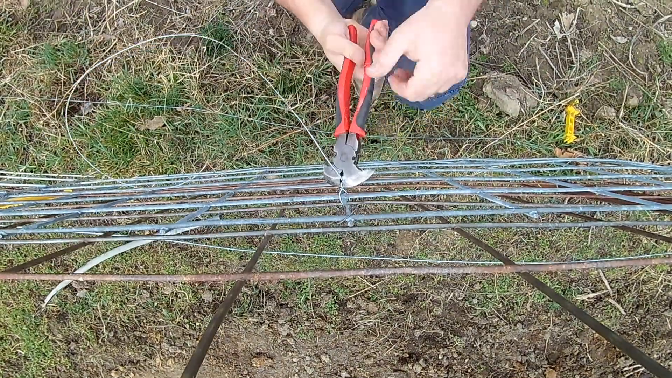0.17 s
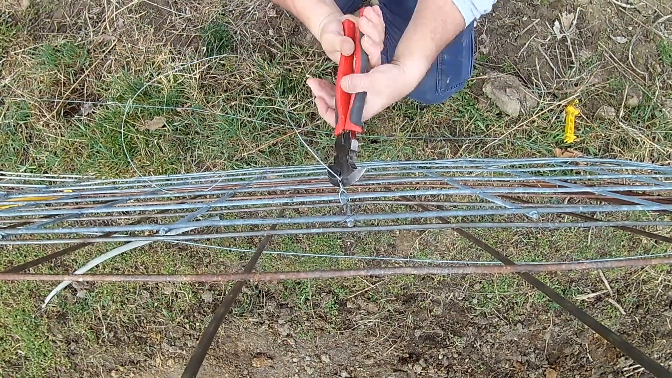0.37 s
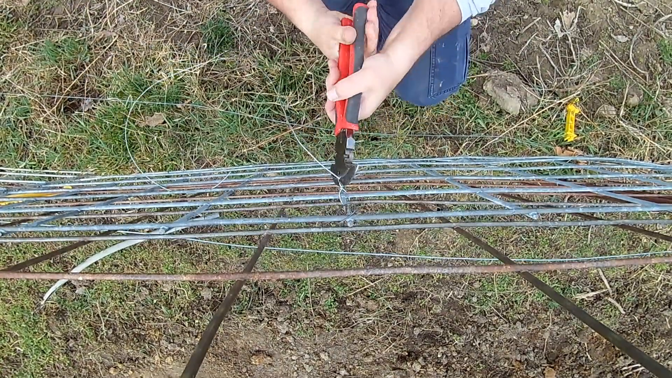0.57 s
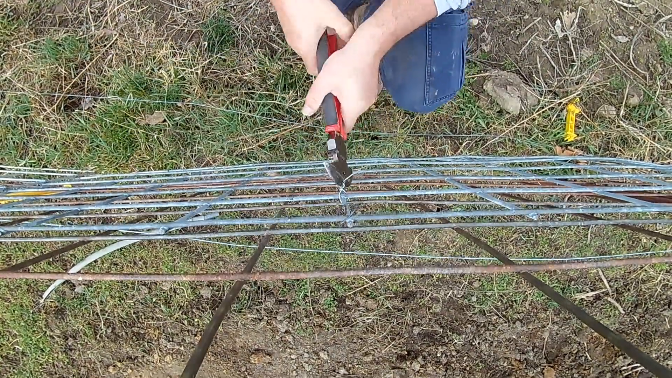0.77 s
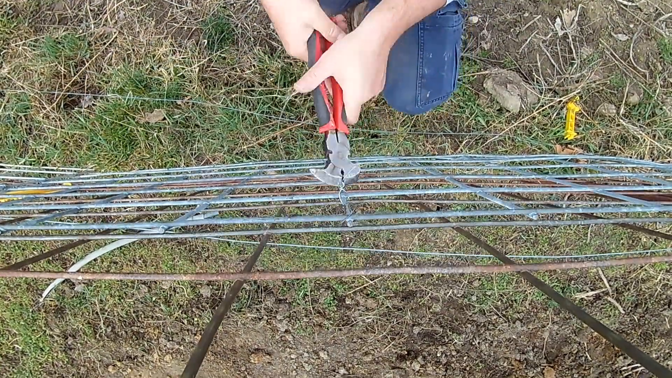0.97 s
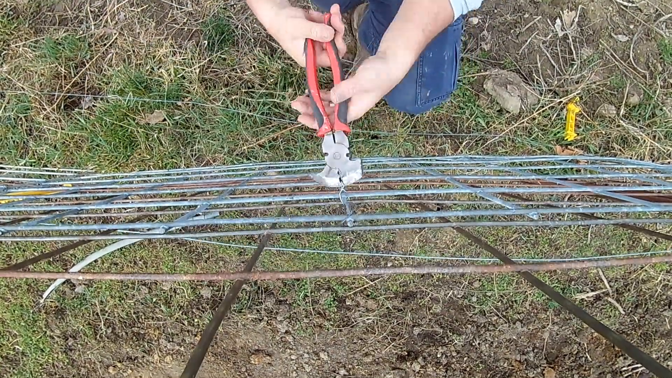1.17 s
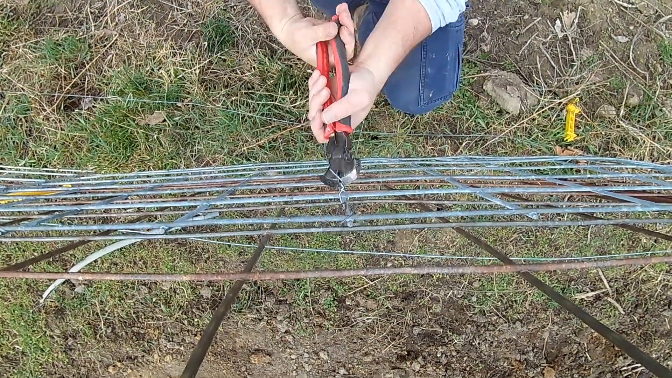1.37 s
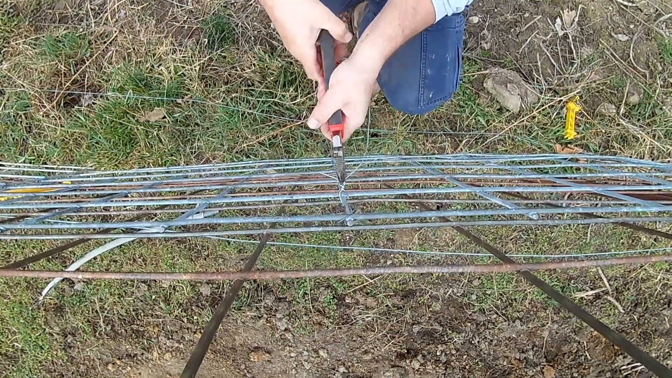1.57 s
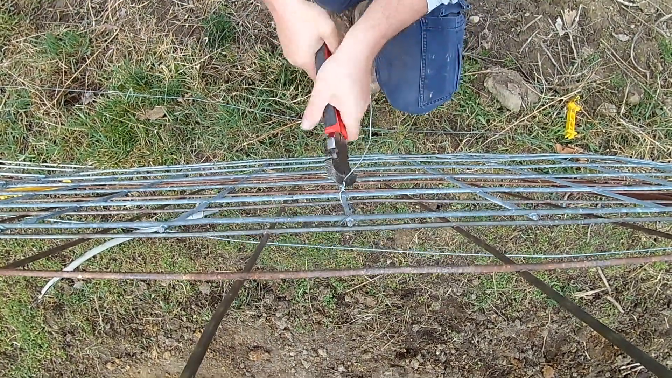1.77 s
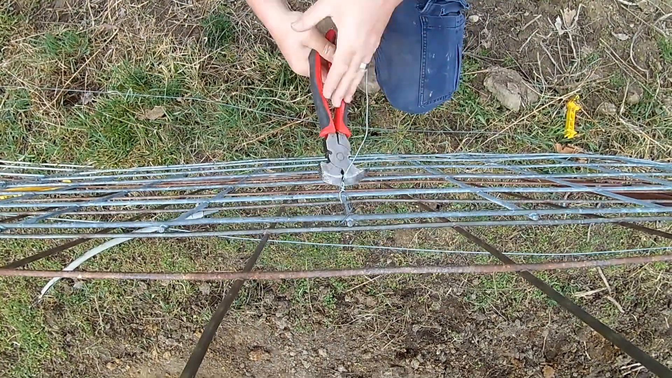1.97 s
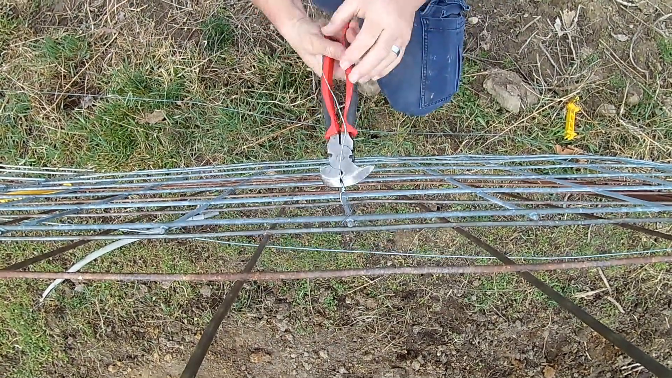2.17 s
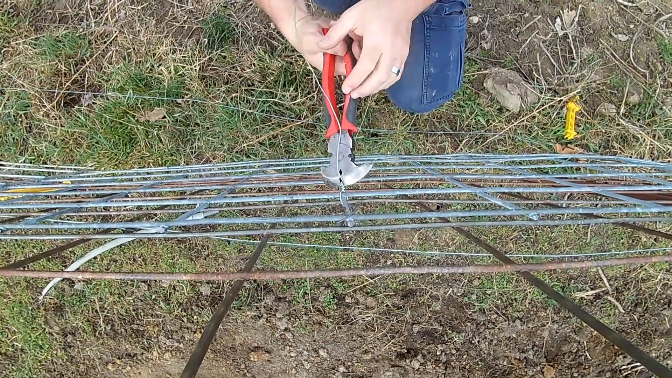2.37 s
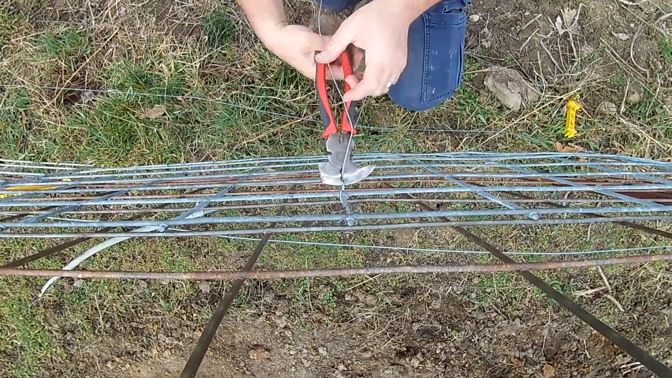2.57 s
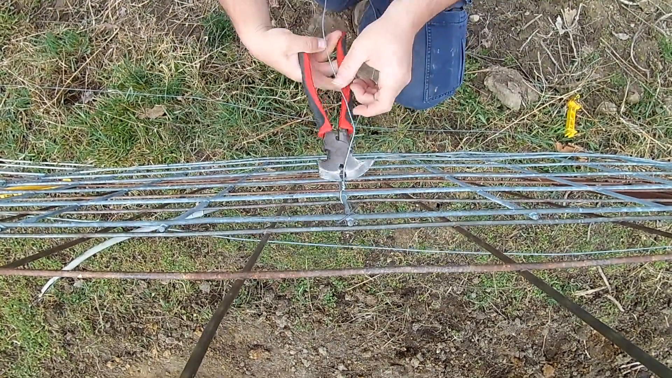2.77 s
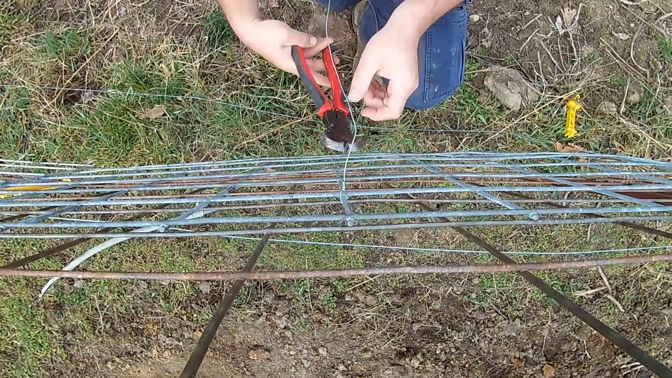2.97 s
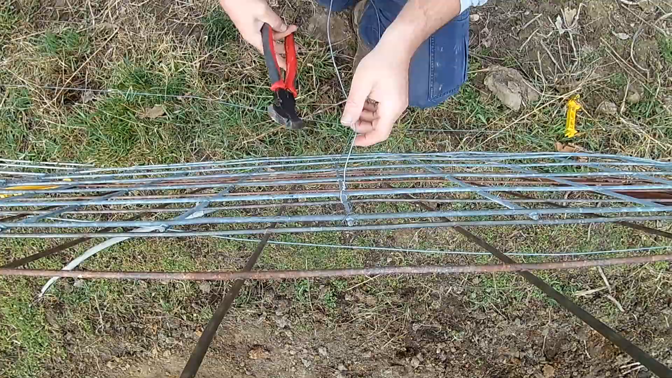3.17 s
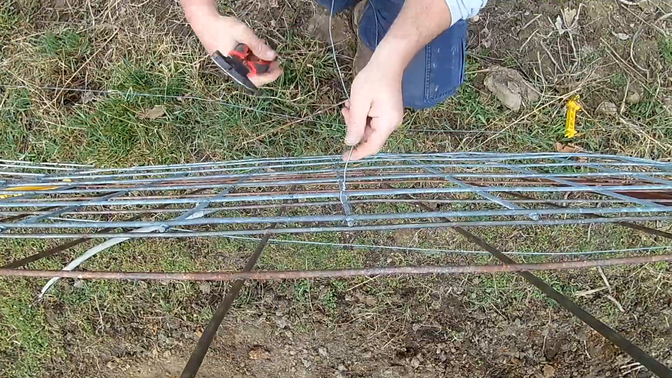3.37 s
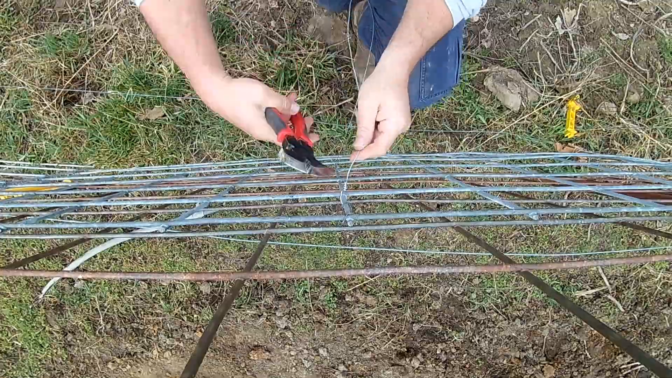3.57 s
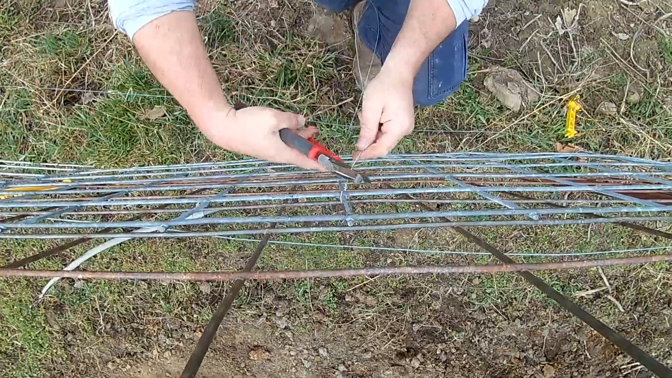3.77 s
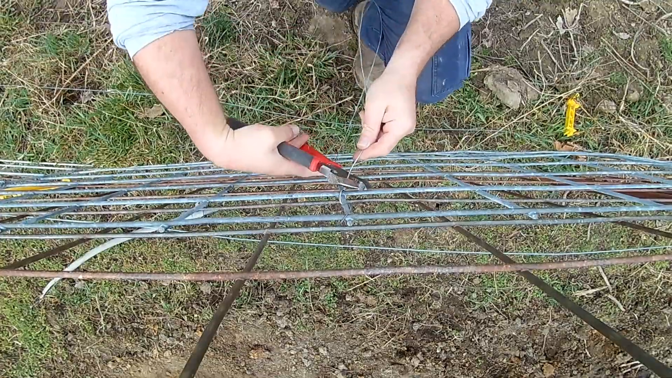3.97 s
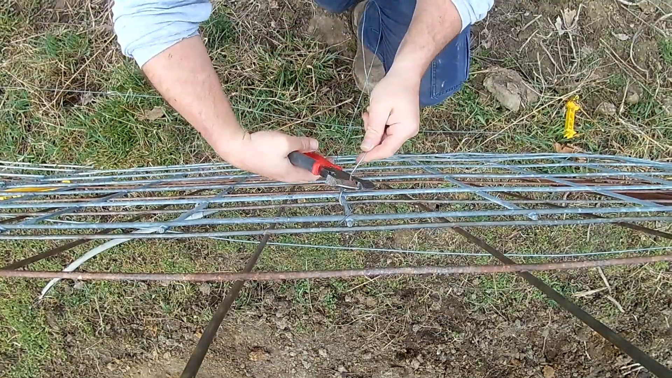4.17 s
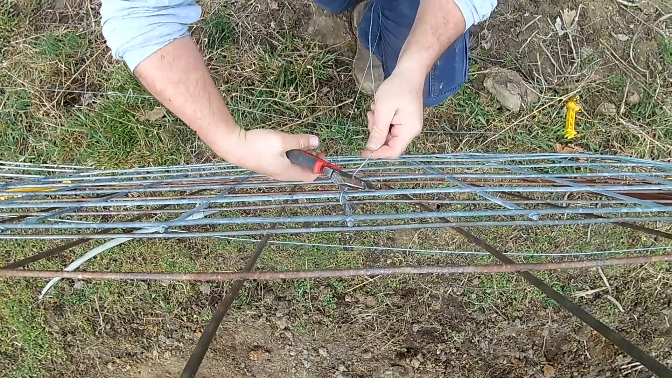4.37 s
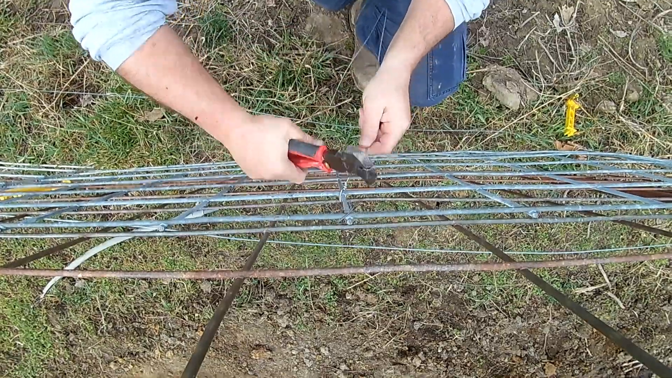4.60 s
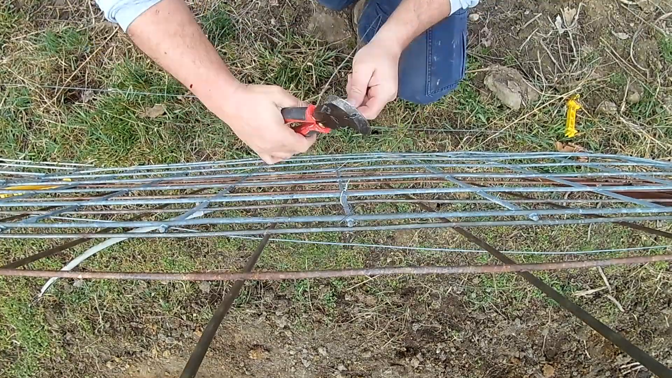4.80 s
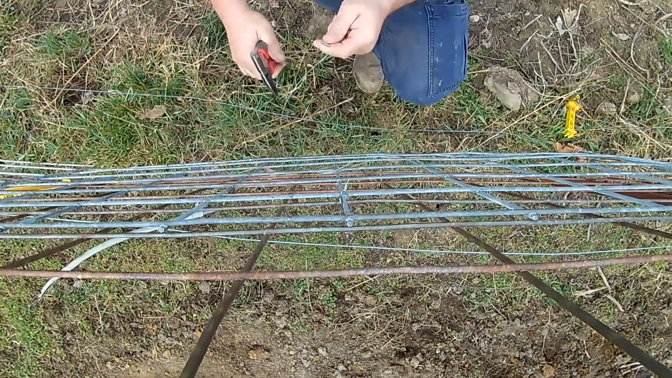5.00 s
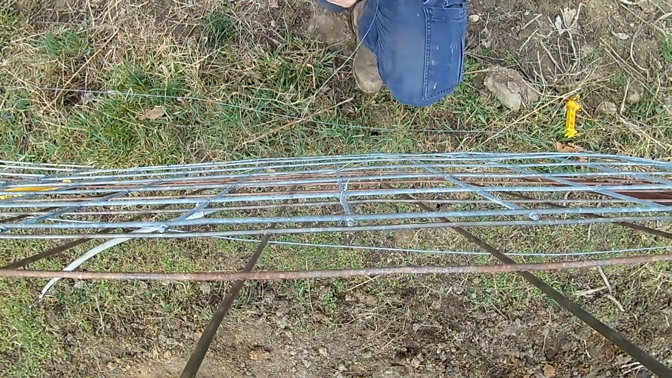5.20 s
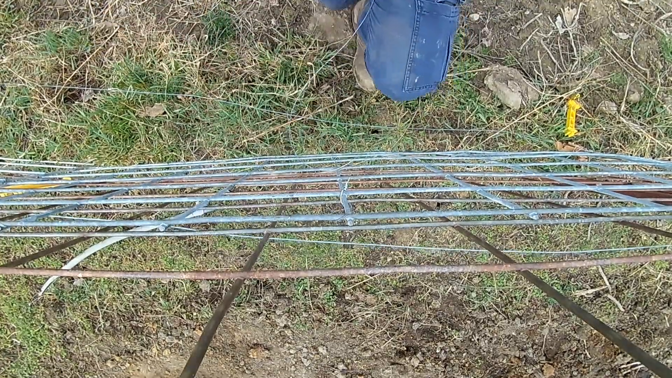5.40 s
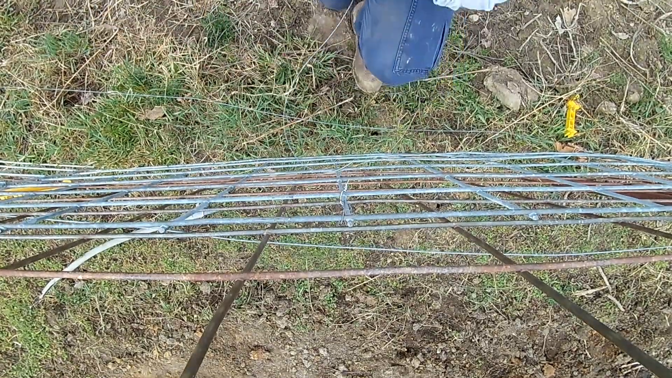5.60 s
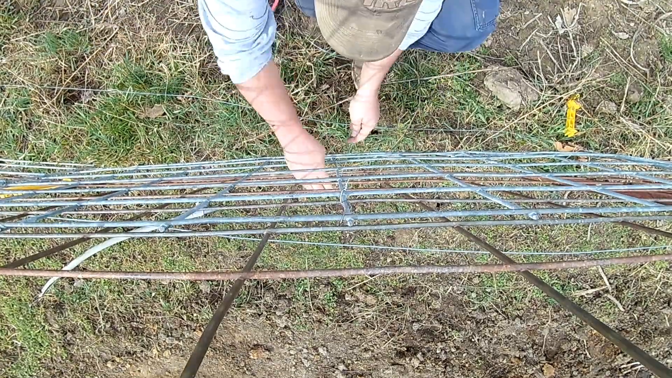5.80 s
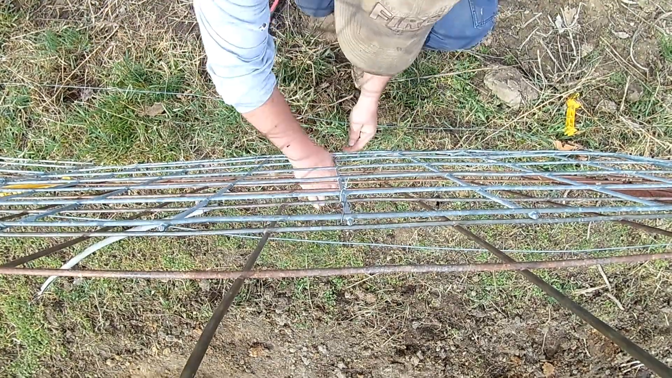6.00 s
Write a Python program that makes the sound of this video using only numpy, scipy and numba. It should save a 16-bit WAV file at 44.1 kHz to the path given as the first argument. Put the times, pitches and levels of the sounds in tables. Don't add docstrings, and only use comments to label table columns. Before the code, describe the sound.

Pliers twist and snip a tie wire on a welded steel fence panel, squealing scrapes and clanging ring over faint outdoor wind.

```python
import sys
import numpy as np
from numba import njit
from scipy import signal
from scipy.fft import rfft, irfft
from scipy.io import wavfile
from scipy.ndimage import uniform_filter1d, minimum_filter1d, map_coordinates

SR = 44100
rng = np.random.default_rng(int(sys.argv[2]) if len(sys.argv) > 2 else 0)


def boost_factor(decibels):
    exponent = np.asarray(decibels, float) / 20
    return 10 ** exponent


def file_out(sig):
    cols = np.atleast_2d(sig).T
    lim = np.clip(cols, -1, 1)
    pcm = np.round(lim * 32767).astype(np.int16)
    wavfile.write(sys.argv[1], SR, pcm)


N = 266540

# t/s, level/dB
WIND = [(0.0, -67), (0.89, -64), (0.96, -54), (1.14, -62), (1.39, -53), (3.95, -60), (4.02, -47),
        (4.29, -50), (4.64, -46), (5.7, -65.5), (5.74, -45), (6.04, -44)]
# f/Hz, density/dB
AIR = [(59, -27), (100, -6.5), (147, -13.5), (190, -14), (271, -22), (791, -25), (945, -21.5), (1850, -43),
       (3500, -43.5), (4550, -88.5), (7700, -120)]
# from f/Hz, to f/Hz, mode count, t60/s, scrape roughness/dB, lift of strongest modes/dB
PARTS = [
    (70, 140, 6, .5, .6, 1.5),
    (160, 750, 50, 1.1, 1.2, 5),
    (750, 1750, 90, .85, 3., 6),
    (1750, 3200, 150, .6, 3.5, 7),
    (3200, 5800, 90, .35, 2.5, 10),
    (8400, 15700, 140, .15, 2., -25),
]
# wind excitation level/dB, far-panel return level/dB, return t60/s
FAR = [(-70.5, -6, 2.3), (-76, -7, 2.46), (-65.5, -10.5, 2.15), (-75, -22.5, 5), (-83.5, -25.5, 1.8),
       (-104, -22, 0.73)]
# f/Hz, density/dB
PANEL_COLOUR = [(41, -47), (70, -24.5), (103, -8), (151, -11.5), (240, -12.5), (305, -21.5), (462, -2.5),
                (578, -11.5), (890, -12), (1060, -13.5), (1130, -18), (1580, -3.5), (1740, -8),
                (2250, -14.5), (3200, -13), (4160, -51), (7040, -120)]
# f/Hz, density/dB
WELD_COLOUR = [(1880, -35), (3200, 2.5), (3440, -16), (4020, -9), (4200, 2), (4320, -8.5), (4560, 8),
               (5110, -15), (5260, -7.5), (5550, 5), (5800, -5.5), (7540, -47), (12800, -120)]
# f/Hz, level/dB
STRONG_MODES = [(96.9, -52), (242.2, -42.5), (355.3, -48), (457.6, -45), (640.6, -49), (678.3, -47),
                (904.4, -28.5), (985.1, -62), (1163, -26.5), (1335, -30.5), (1604, -42), (1782, -44.5),
                (1922, -48.5), (2078, -87), (2186, -41.5), (2519, -43), (2880, -52), (3289, -70),
                (3321, -52.5), (3580, -74.5), (3623, -60), (3736, -74.5), (3784, -60), (3941, -70.5),
                (4156, -60.5), (4420, -91), (4474, -51), (4888, -61), (5173, -63), (5453, -52.5)]
# f/Hz, width/Hz, level/dB
THIN_GROUPS = [(6100, 39, 1), (5700, 50, -15), (6870, 100, -11), (6890, 120, -13.5), (6980, 240, -2.5),
               (7030, 350, -30), (7660, 52, -18), (8900, 130, -7.5), (9620, 47, -14.5), (10400, 170, -14),
               (11100, 120, -16.5), (11600, 100, -24.5)]
# start t/s, length/s, rods level/dB, frame re rods/dB, welds re rods/dB
SCRAPES = [(0.125, 0.052, -26, -6.5, -9), (0.856, 0.052, -26.5, -5, -9.5), (1.659, 0.02, -47.5, -21.5, -11),
           (2.077, 0.045, -32.5, -17.5, -8), (2.17, 0.03, -23.5, -7, -13), (2.504, 0.017, -35.5, -3, -22),
           (2.872, 0.023, -38.5, -0.5, -18), (3.563, 0.021, -46.5, -11, -17), (3.86, 0.12, -40, -4, -28),
           (3.962, 0.027, -32, -1.5, -12.5), (3.994, 0.037, -28, -0.5, -26.5),
           (4.453, 0.089, -39.5, -5.5, -14.5), (4.598, 0.061, -17, -2, -16), (5.18, 0.058, -47.5, -9, -5.5),
           (5.51, 0.052, -49, -9, -12.5), (5.836, 0.15, -51.5, 1.5, -13), (5.966, .08, -37, -4.5, -25.5)]
# middle t/s, length/s, rods level/dB, frame re rods/dB, welds re rods/dB
DRAGS = [(.33, 0.15, -26, -11.5, -16.5), (0.47, 0.3, -24, -11, -11), (0.74, 0.48, -33, -13.5, -14.5),
         (1.016, 0.36, -19.5, -10.5, -11), (1.242, .12, -34.5, -6.5, -17), (1.534, 0.059, -49.5, -4, -11),
         (1.914, 0.79, -53.5, -0.5, -9.5), (3.7, 0.17, -54.5, -1.5, -27), (4.244, 0.35, -40, 4.5, -16),
         (4.8, 0.41, -26.5, -4.5, -26), (3.385, 0.036, -56.5, -6, -6.5)]
# t/s, rods level/dB, frame re rods/dB, welds re rods/dB
BLOWS = [(0.125, -17, -15, -13.5), (2.1, -20.5, -18, -19.5), (2.189, -24.5, -9.5, -5),
         (2.889, -31, -12.5, -15.5), (3.881, -30.5, -5.5, -16), (3.977, -33.5, 2, -21),
         (4.009, -20, -12, -21.5), (4.482, -25, -9.5, -24), (4.624, -1.5, -8, -17.5), (5.193, -55, -8, 1.5),
         (5.512, -38.5, -15, -15.5), (5.96, -35, -3.5, -8)]
# t/s, level/dB
BUMPS = [(0.3, -51), (0.907, -41), (1.106, -46), (2.301, -41), (2.723, -39.5), (3.036, -41), (3.266, -49),
         (4.012, -27), (4.227, -31.5), (4.48, -36), (4.633, -25), (4.709, -28), (4.899, -48), (5.75, -38),
         (5.838, -36.5)]
# f/Hz, level/dB, t60/s
STAND_MODES = [(82, -6, .2), (96, 2.5, 0.43), (119, -9, 0.23)]
# t/s, length/s, from f/Hz, to f/Hz, level/dB
CHIRPS = [
    (3.135, .045, 4080, 4000, -72),
    (3.19, .04, 3380, 3250, -67),
    (3.222, .04, 3120, 2800, -69),
]
# t/s, level/dB
JOINT_CLICKS = [
    (3.401, -47.5),
    (3.4224, -47),
    (3.436, -58),
    (3.4425, -63),
]
# f/Hz, level/dB, t60/s
JOINT_MODES = [(1030, -1, 0.017), (2080, 0.5, 0.013), (3280, -13, .01), (4680, 0.5, 0.0083),
               (5700, 10, 0.0041), (6500, 0, 0.0068)]
# t/s, level/dB, length/s
BUZZ_RUNS = [(4.028, -28.5, 0.016), (4.054, -30.5, 0.02), (4.0897, -25.5, 0.02), (4.116, -27, 0.016),
             (4.174, -41, 0.0085), (4.232, -44.5, 0.006), (4.256, -34, 0.0085), (4.315, -34.5, 0.011),
             (4.348, -46.5, 0.01), (4.6315, -17.5, 0.046), (4.67, -23.5, 0.099), (4.676, -13.5, 0.023),
             (4.712, -28, 0.05), (4.768, -26, 0.027), (4.8194, -36.5, 0.014), (4.8966, -27, 0.015)]
# t/s, gain
FADE = [
    (5.665, 1),
    (5.712, 0.045),
    (5.722, 0),
    (5.76, 0.85),
]

CUT_S = 5.716


def track(points):
    t_s, value = np.array(points, float).T
    return np.interp(np.arange(N) / SR, t_s, value)


def shape(points, hz):
    at_hz, db = np.array(points, float).T
    return np.interp(np.log(hz), np.log(at_hz), db)


def coloured(points):
    gain = boost_factor(shape(points, np.fft.rfftfreq(N, 1 / SR) + 1))
    noise = irfft(rfft(rng.standard_normal(N)) * gain, N)
    return noise / noise.std()


def passband(x, lo_hz, hi_hz):
    sos = signal.butter(3, [lo_hz, min(hi_hz, .45 * SR)], "band", fs=SR, output="sos")
    return signal.sosfilt(sos, x)


def ticks(times_s, sizes):
    x = np.full(N, 1e-18)
    np.add.at(x, np.minimum((np.asarray(times_s) * SR).astype(int), N - 1), sizes)
    return x


def decaying(x, tau_s):
    return signal.lfilter([1], [1, -np.exp(-1 / (tau_s * SR))], x)


@njit(fastmath=True)
def ring(force, hz, t60, gain, stop):
    pole = np.exp((2j * np.pi * hz - np.log(1000) / t60) / SR)
    c, s = pole.real.copy(), pole.imag.copy()
    re, im, out = 0 * hz, 0 * hz, 0 * force
    for i in range(len(force)):
        if i == stop:
            re, im = 0 * hz, 0 * hz
        total = 0.
        for k in range(len(hz)):
            turned = re[k] * c[k] - im[k] * s[k] + force[i]
            im[k] = re[k] * s[k] + im[k] * c[k]
            re[k] = turned
            total += gain[k] * im[k]
        out[i] = total
    return out


def knocks(times_s, sizes, modes, lo_hz, hi_hz):
    hz, db, t60 = np.array(modes, float).T
    return ring(passband(ticks(times_s, sizes), lo_hz, hi_hz), hz, t60, boost_factor(db), -1)


def outdoors():
    gust_db, gust_hz, air_db = 5, 9.8, -71.5
    wind = coloured([(10, -35.5), (25, 5.0), (60, 8.0), (120, -30.0), (300, -15.0), (1000, -61)])
    gusts = np.interp(np.arange(N) / SR * gust_hz, np.arange(200), rng.standard_normal(200))
    return boost_factor(track(WIND) + gust_db * gusts) * wind + boost_factor(air_db + 12.5) * coloured(AIR)


def fading(x, t60_s):
    keep = np.exp(-2 * np.log(1000) / (t60_s * SR))
    shots = np.split(x, [int(CUT_S * SR)])
    return np.concatenate([signal.lfilter([1 - keep], [1, -keep], shot) for shot in shots])


def strokes():
    attack_s, release_s = 0.0073, 0.042
    stand_re_frame_db, short_rods_db, short_rods_weld_share = -18.5, 2.5, 0.54
    t = np.arange(0, N, 32)[:, None] / SR
    start_s, length_s = np.array(SCRAPES).T[:2]
    release = np.exp(-np.maximum(t - start_s - length_s, 0) / release_s)
    sudden = np.clip((t - start_s) / attack_s, 0, 1) ** 2 * release
    middle_s, length_s = np.array(DRAGS).T[:2]
    slow = np.cos(np.pi * np.clip((t - middle_s) / length_s, -.5, .5)) ** 2
    rods, frame, welds = np.array(SCRAPES + DRAGS).T[2:]
    short_rods = short_rods_db + short_rods_weld_share * welds
    db = rods + np.array([frame + stand_re_frame_db, frame, 0 * rods, short_rods, welds, welds])
    power = boost_factor(2 * db) @ np.c_[sudden, slow].T
    return [np.interp(np.arange(N) / SR, t[:, 0], part) for part in power]


def wandering(width_hz, patchy_db, hold_s=.12):
    hz, t, z = signal.stft(rng.standard_normal(N), SR, nperseg=2048)
    field = rng.standard_normal((400, 200))
    at = np.meshgrid(np.minimum(hz / width_hz, 399), np.minimum(t / hold_s, 199), indexing="ij")
    patches = boost_factor(patchy_db * map_coordinates(field, at, order=1))
    noise = signal.istft(z * patches, SR, nperseg=2048)[1][:N]
    return noise / noise.std()


def part_modes(lo_hz, hi_hz, count, t60_s, lift_db):
    step = np.log(hi_hz / lo_hz) / count
    place = np.arange(count) + .5 + 0.381 * rng.standard_normal(count)
    hz = lo_hz * np.exp(step * place)
    t60 = t60_s * (hz / (0.59 * lo_hz)) ** -.4 * np.exp(0.21 * rng.standard_normal(count))
    if lo_hz > 6000:
        middle_hz, width_hz, more_db = np.repeat(THIN_GROUPS, 4, axis=0).T
        more_hz = middle_hz + .5 * width_hz * rng.standard_normal(len(middle_hz))
        more_t60 = np.full(len(more_hz), 0.18)
        db = np.full(count, float(lift_db))
    else:
        db = shape(WELD_COLOUR if lo_hz > 3000 else PANEL_COLOUR, hz) + 10 * np.log10(hz)
        more_hz, more_db = np.array([m for m in STRONG_MODES if lo_hz < m[0] < hi_hz], float).T
        more_db = more_db + lift_db + np.median(db) - np.median(more_db)
        more_t60 = np.full(len(more_hz), 0.43 * t60_s)
    hz, db, t60 = np.r_[hz, more_hz], np.r_[db, more_db], np.r_[t60, more_t60]
    share = boost_factor(db) / np.sqrt(np.sum(boost_factor(db) ** 2))
    sign = rng.choice([-1., 1.], len(hz))
    return hz, t60, share * np.sqrt(4 * np.log(1000) / t60 / SR) * sign


def panel():
    scrape_db, blow_db, thin_db = -2.0, -9.5, -23
    lull_s, contact_s, lead_s, frame_lag_s = 0.0071, 0.01, .006, 0.032
    fine, coarse = (rng.exponential(size=N // n + 1).repeat(n)[:N] for n in (40, 500))
    slips = np.minimum(fine + 0.65 * coarse, 5)
    blow_s, rods_db, frame_db, welds_db = np.array(BLOWS, float).T
    blow_s = blow_s - lead_s
    lull = np.convolve(ticks(blow_s - lull_s, 1.), np.ones(int((lull_s + .008) * SR)))[:N] > .5
    blow_re_rods_db = (frame_db - 3.5, frame_db, -2.5, -5., welds_db + 3.5, welds_db + 7.0)
    out, pushed = 0, strokes()
    for k, (lo_hz, hi_hz, count, t60_s, rough_db, lift_db) in enumerate(PARTS):
        wind_db, back_db, back_s = FAR[k]
        loss = 2 * np.log(1000) / t60_s
        fed = fading(pushed[k], 2 * np.log(1000) * frame_lag_s) if k < 2 else pushed[k]
        fed = fed + boost_factor(2 * back_db) * fading(fed, back_s) + boost_factor(2 * wind_db)
        fed = fed * np.where(lull, .05, 1)
        rough = boost_factor(rough_db * slips)
        scrape = boost_factor(scrape_db) * np.sqrt(fed) * rough / np.sqrt(np.mean(rough ** 2))
        hits = decaying(ticks(blow_s, boost_factor(rods_db + blow_re_rods_db[k] + blow_db)), contact_s)
        force = scrape + hits * np.sqrt(2 / (contact_s * loss))
        force = force * wandering(40 + lo_hz / 12, 2.5 if k < 2 else 4.5)
        rung = ring(force, *part_modes(lo_hz, hi_hz, int(count), t60_s, lift_db), int(CUT_S * SR))
        if k == 5:
            out = out + boost_factor(thin_db) * passband(rung, 4000, hi_hz)
        else:
            rung = passband(rung, 1.12 * lo_hz, 0.94 * hi_hz)
            out = out + passband(rung, 0.49 * lo_hz, 0.97 * hi_hz)
    return out


def jolts(lead_s=0.014):
    bump_s, db = np.array(BUMPS).T
    return knocks(bump_s - lead_s, boost_factor(db - 4), STAND_MODES, 51, 250)


def bird():
    out = np.zeros(N)
    for start_s, length_s, from_hz, to_hz, db in CHIRPS:
        n, i = int(length_s * SR), int(start_s * SR)
        phase = 2 * np.pi * np.cumsum(np.linspace(from_hz, to_hz, n)) / SR
        out[i:i + n] += boost_factor(db) * np.hanning(n) * np.sin(phase)
    return out


def plier_joint():
    click_s, db = np.array(JOINT_CLICKS, float).T
    return knocks(click_s, boost_factor(db + 1.0), JOINT_MODES, 700, 4700)


def buzz():
    rate_hz, jitter, scatter_db, spray_db, spray_tau_s = 225., 0.2, 2.0, -61.5, 0.093
    times_s, sizes = [], []
    for start_s, db, length_s in BUZZ_RUNS:
        gaps = 1 + jitter * rng.standard_normal(15)
        at_s = np.r_[0, np.cumsum(gaps)] / rate_hz
        level = boost_factor(db - 5.5 + scatter_db * rng.standard_normal(16))
        times_s += list(start_s + at_s)
        sizes += list(level * np.clip((length_s - at_s) * rate_hz, 0, 1))
    spray = decaying(ticks(times_s, sizes), spray_tau_s) * rng.standard_normal(N)
    modes = [(3750, 2.5, 0.0069), (4010, 1, 0.0056), (5100, -3.5, 0.0041)]  # f/Hz, level/dB, t60/s
    return boost_factor(spray_db) * passband(spray, 6200, 15500) + knocks(times_s, sizes, modes, 3200, 5150)


def limit(x):
    gain = minimum_filter1d(np.minimum(.72 / (np.abs(x) + 1e-9), 1), size=801, axis=1)
    return x * uniform_filter1d(gain, size=801, axis=1)


def thin_out(x):
    lo_hz, under_db, near_db = 3200, -41.0, -3.5
    hz, _, z = signal.stft(x, SR, nperseg=2048)
    power = uniform_filter1d(np.abs(z) ** 2, size=2, axis=1)
    middle = power[:, (hz > 700) & (hz < lo_hz)].mean(axis=1, keepdims=True)
    slope = np.clip((hz[:, None] - lo_hz) / 1500, .25, 1)
    near = uniform_filter1d(power, size=40, axis=1) * boost_factor(2 * near_db) * slope
    under_middle = (power < middle * boost_factor(2 * under_db)) & (hz < 5800)[:, None]
    weak = (under_middle | (power < near)) & (hz > lo_hz)[:, None]
    return signal.istft(z * np.where(weak, boost_factor(-20), 1), SR, nperseg=2048)[1][:, :N]


def scene():
    return (outdoors() + panel() + jolts() + bird() + plier_joint() + buzz())[None]


def top_cut(x):
    return signal.sosfilt(signal.butter(12, 15850, fs=SR, output="sos"), x)


def record(dry):
    hiss = boost_factor(-86.5) * passband(rng.standard_normal(N), 3300, 15500)
    mix = thin_out(limit(dry + hiss)) * track(FADE)
    return top_cut(mix)


dry = scene()
out = record(dry)
file_out(out)
```